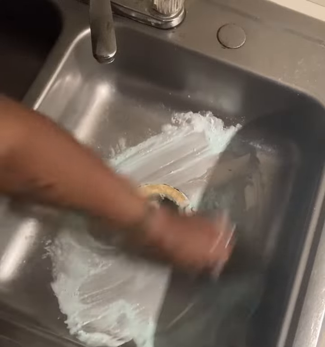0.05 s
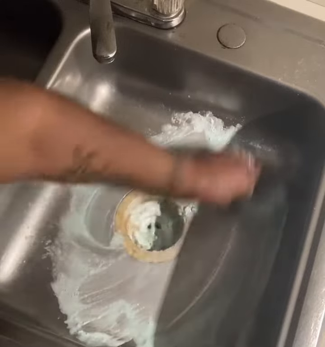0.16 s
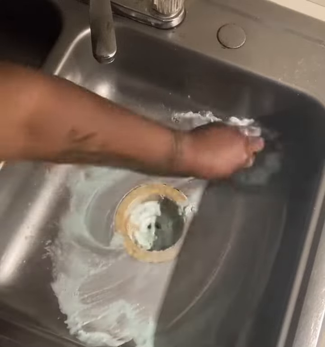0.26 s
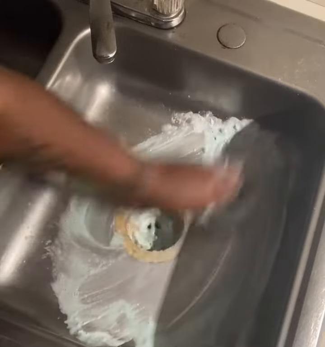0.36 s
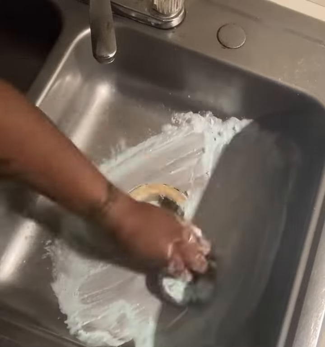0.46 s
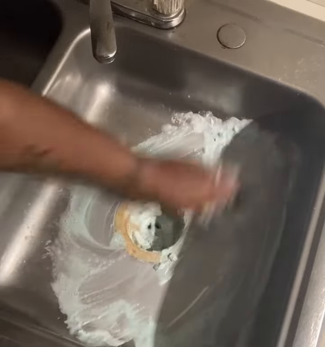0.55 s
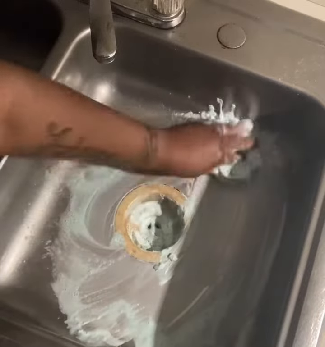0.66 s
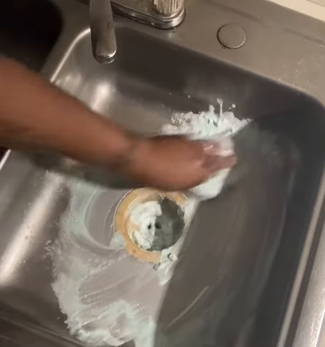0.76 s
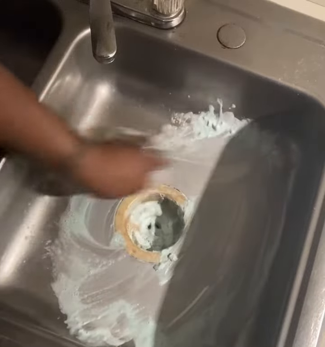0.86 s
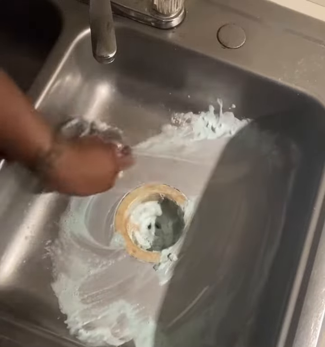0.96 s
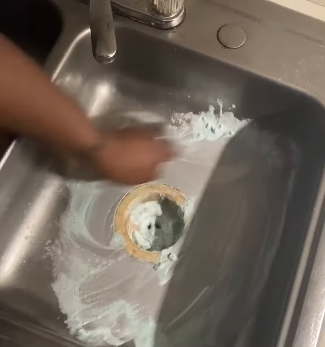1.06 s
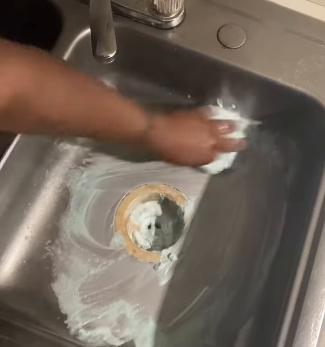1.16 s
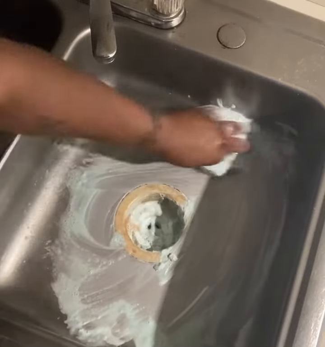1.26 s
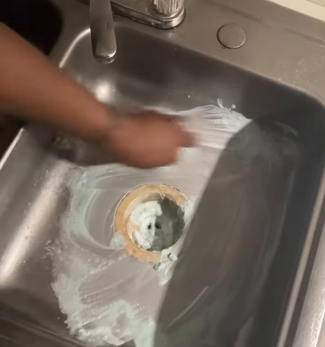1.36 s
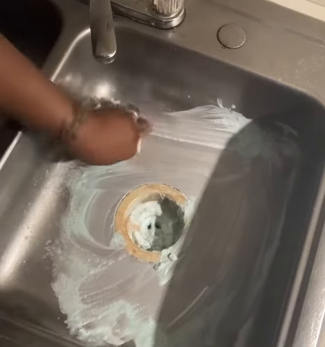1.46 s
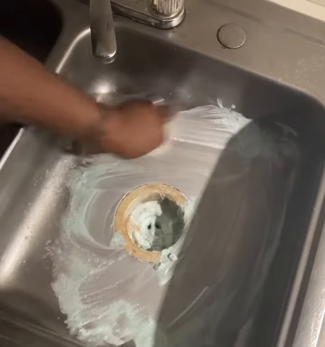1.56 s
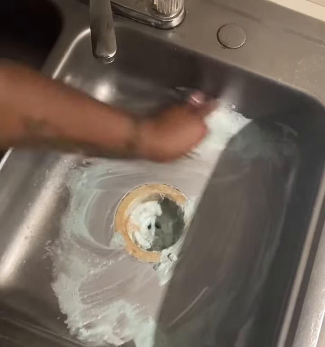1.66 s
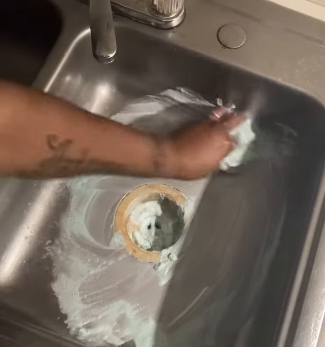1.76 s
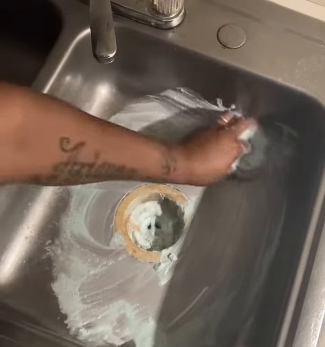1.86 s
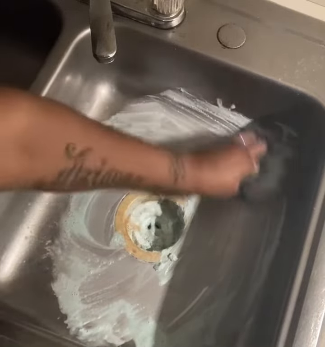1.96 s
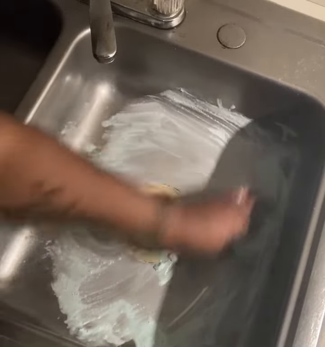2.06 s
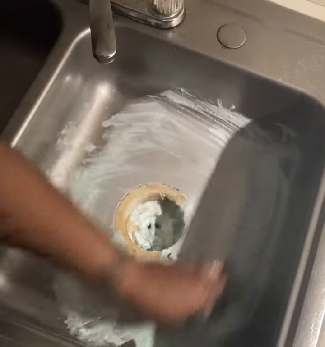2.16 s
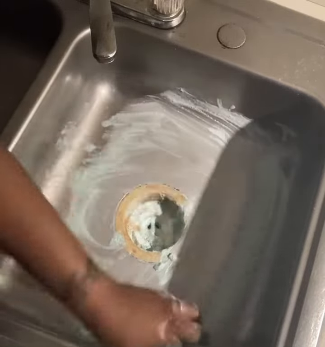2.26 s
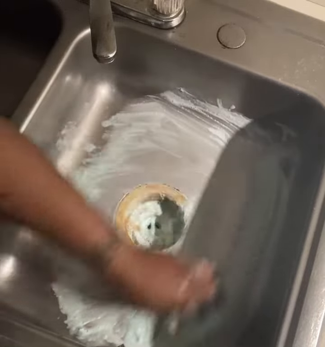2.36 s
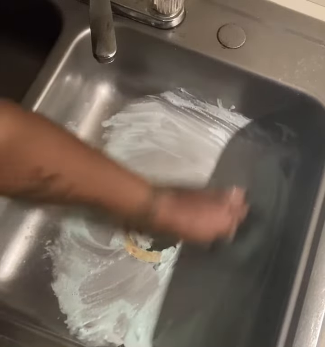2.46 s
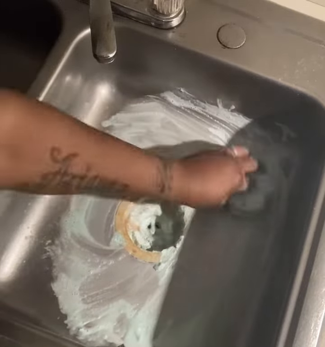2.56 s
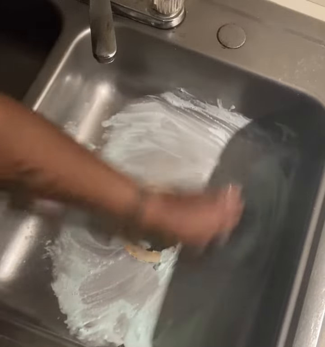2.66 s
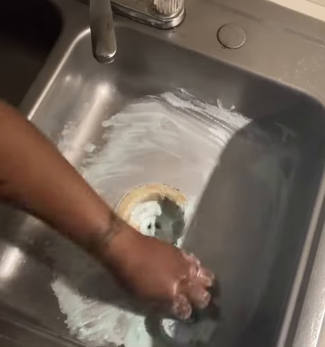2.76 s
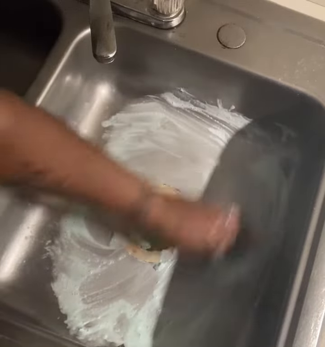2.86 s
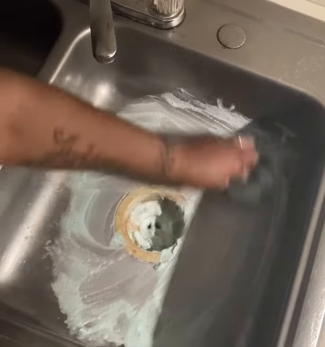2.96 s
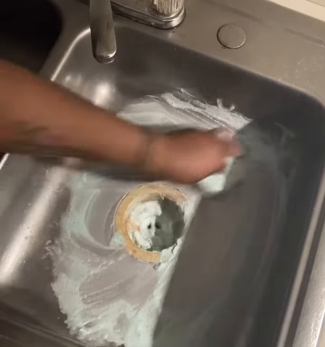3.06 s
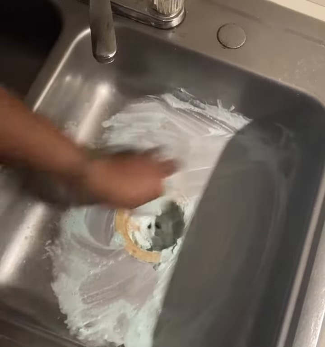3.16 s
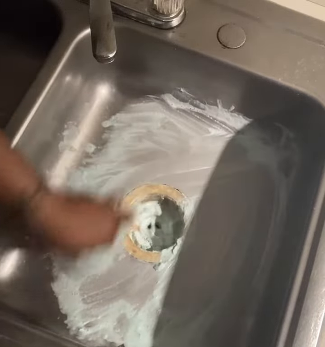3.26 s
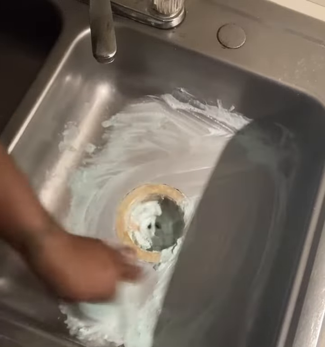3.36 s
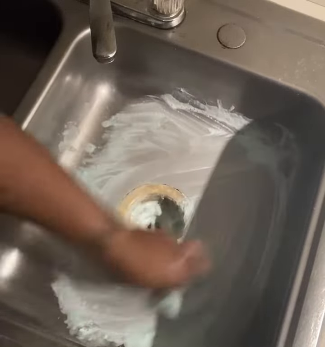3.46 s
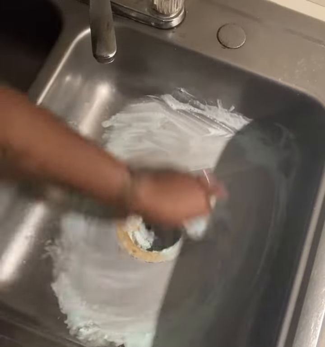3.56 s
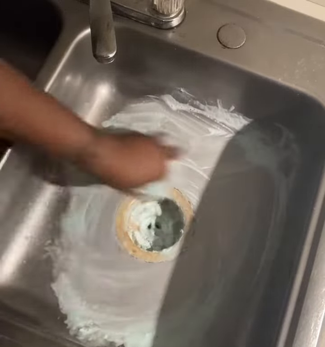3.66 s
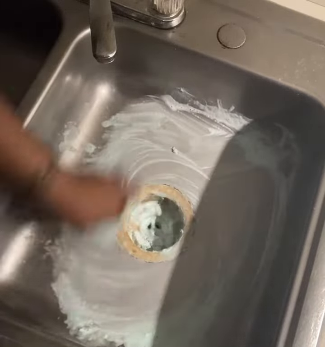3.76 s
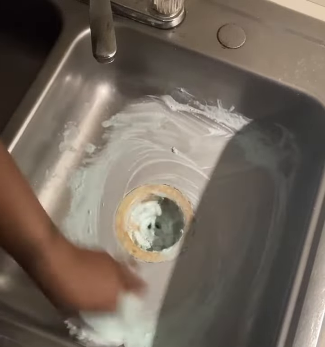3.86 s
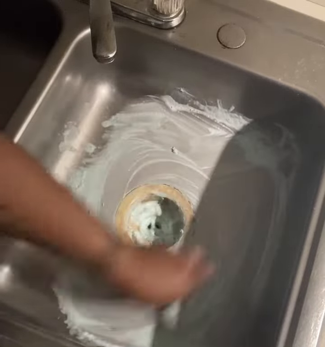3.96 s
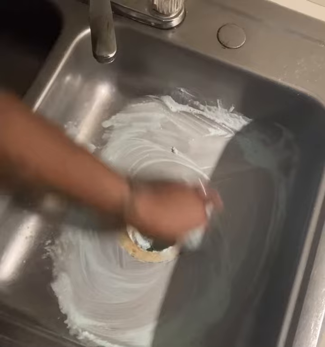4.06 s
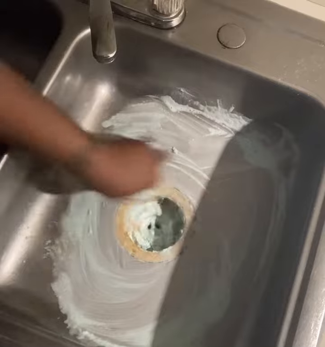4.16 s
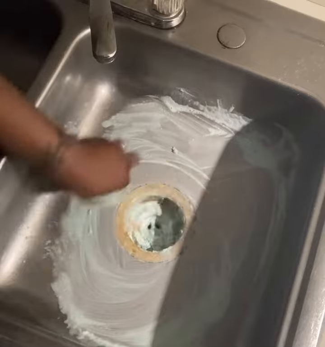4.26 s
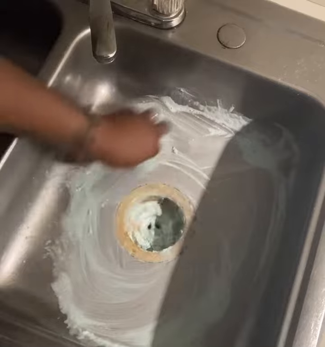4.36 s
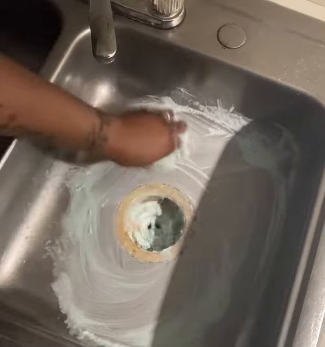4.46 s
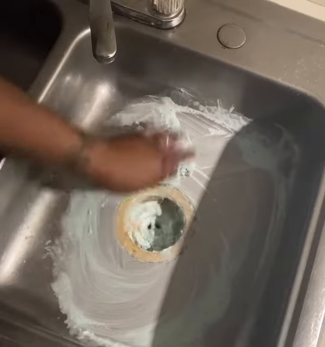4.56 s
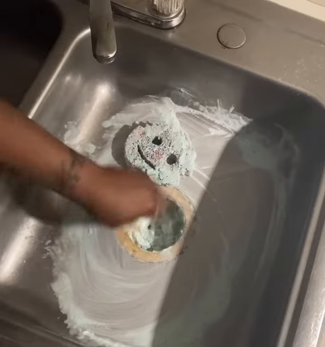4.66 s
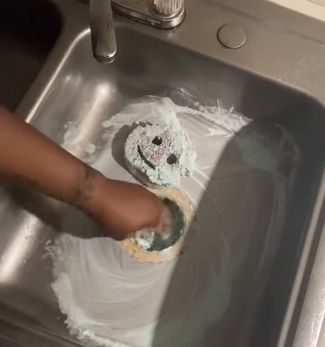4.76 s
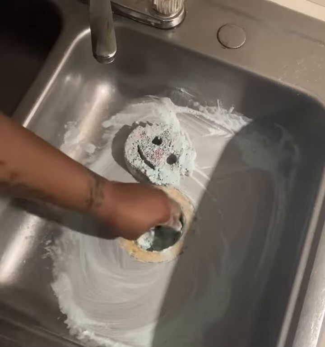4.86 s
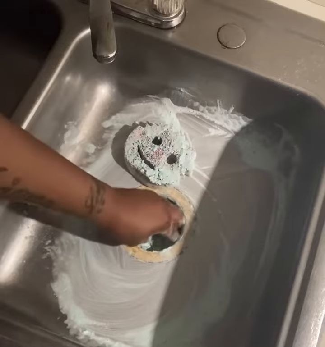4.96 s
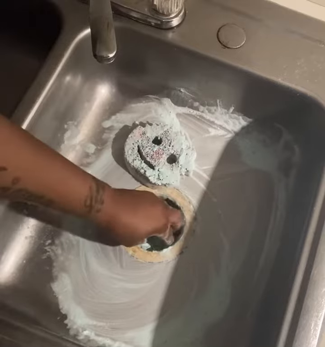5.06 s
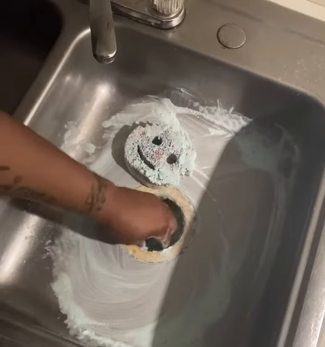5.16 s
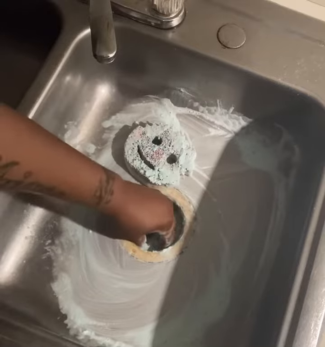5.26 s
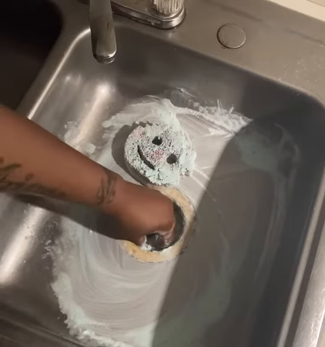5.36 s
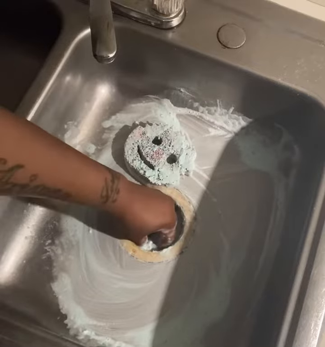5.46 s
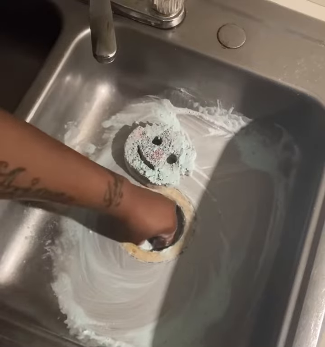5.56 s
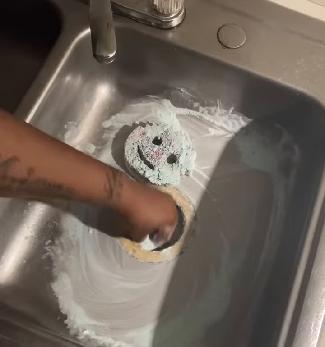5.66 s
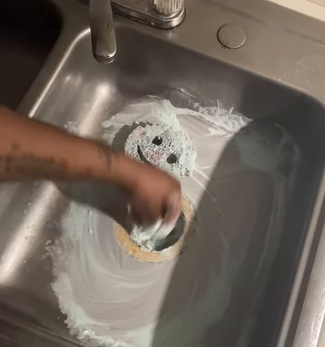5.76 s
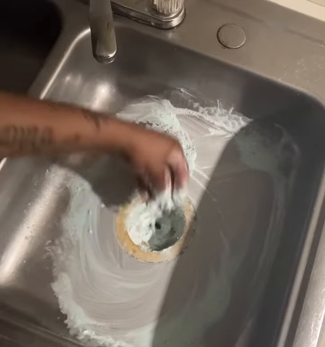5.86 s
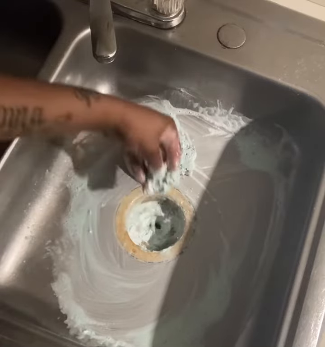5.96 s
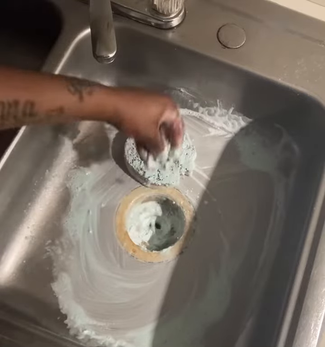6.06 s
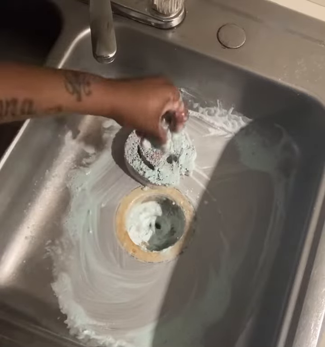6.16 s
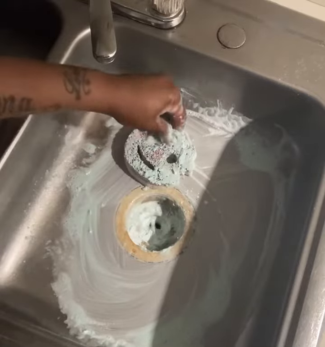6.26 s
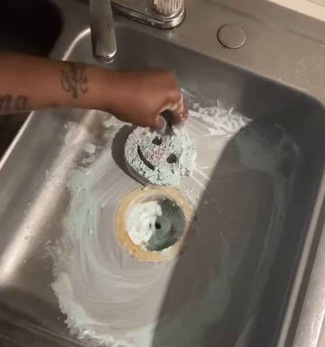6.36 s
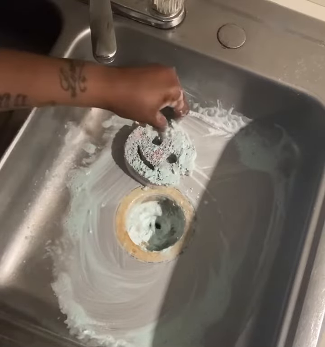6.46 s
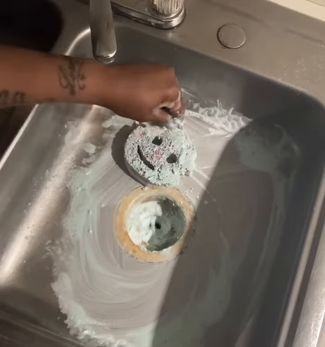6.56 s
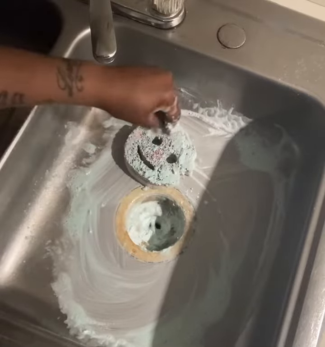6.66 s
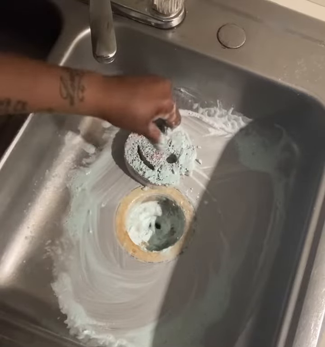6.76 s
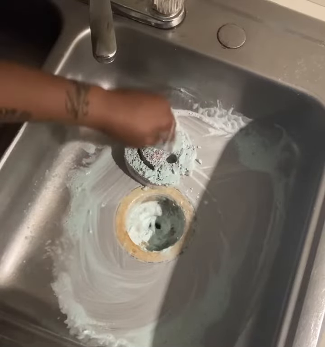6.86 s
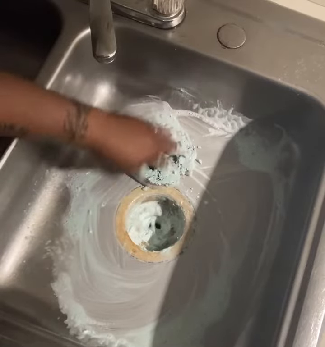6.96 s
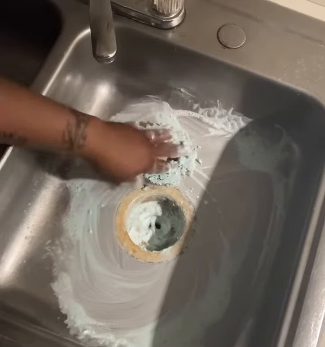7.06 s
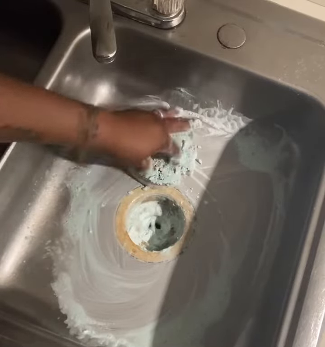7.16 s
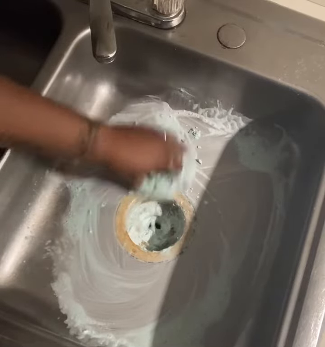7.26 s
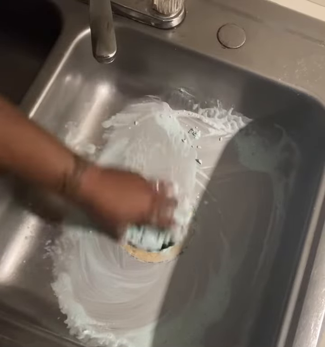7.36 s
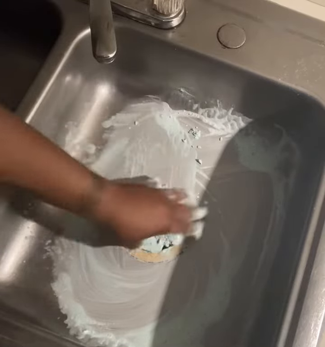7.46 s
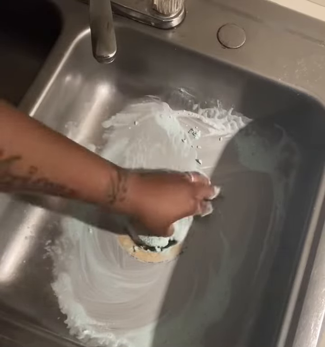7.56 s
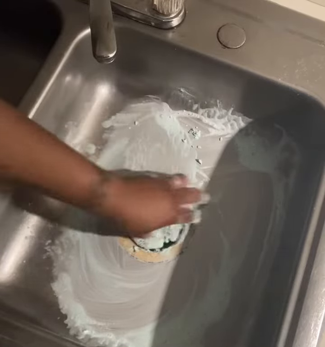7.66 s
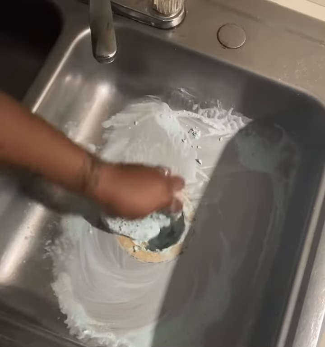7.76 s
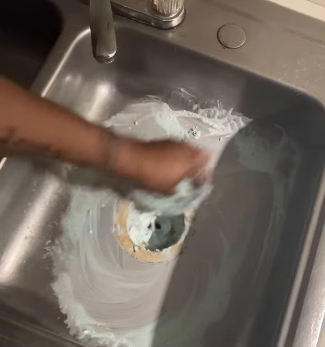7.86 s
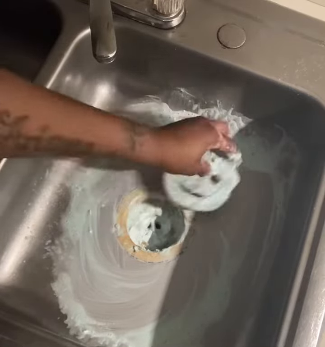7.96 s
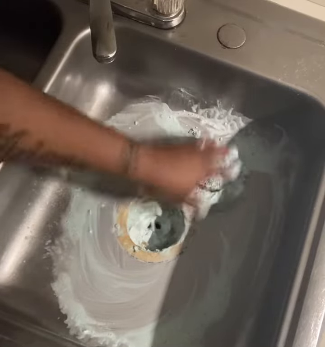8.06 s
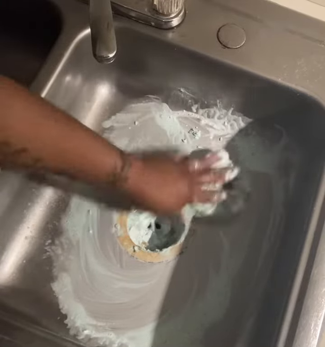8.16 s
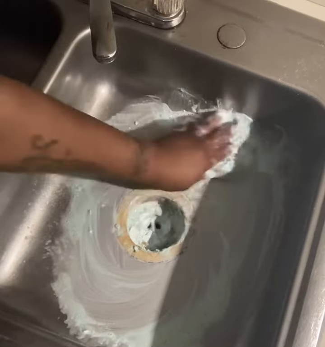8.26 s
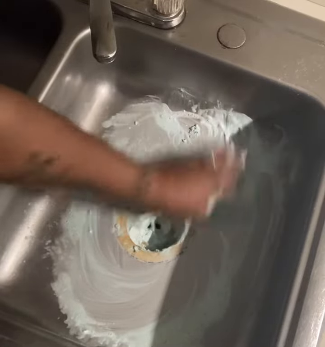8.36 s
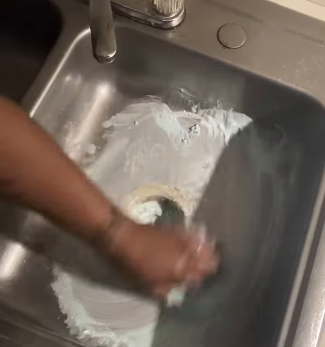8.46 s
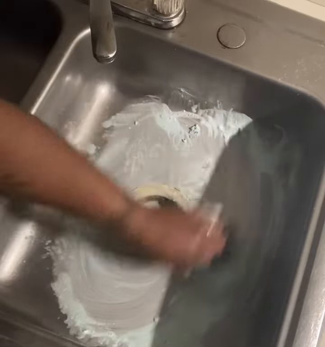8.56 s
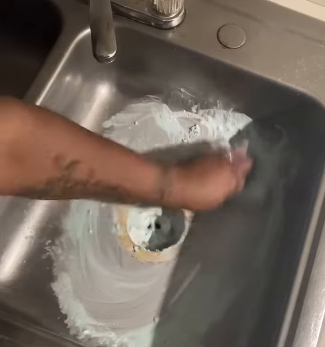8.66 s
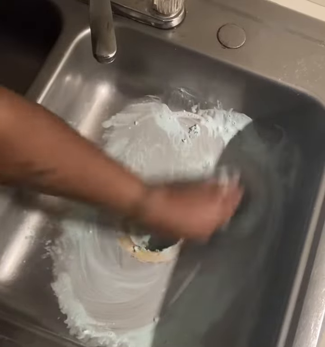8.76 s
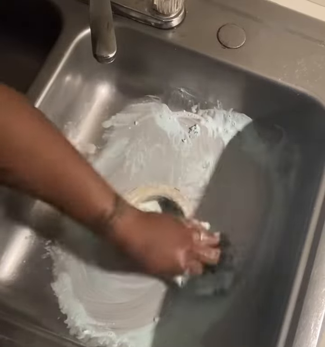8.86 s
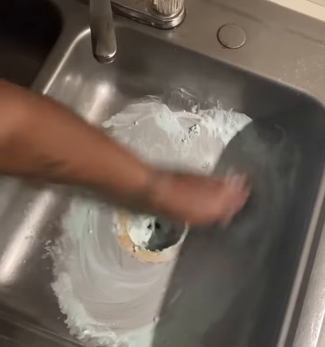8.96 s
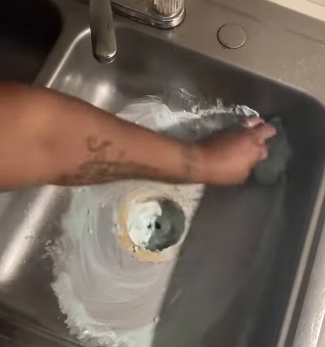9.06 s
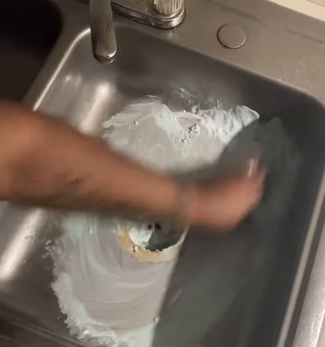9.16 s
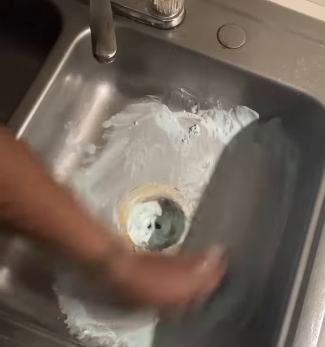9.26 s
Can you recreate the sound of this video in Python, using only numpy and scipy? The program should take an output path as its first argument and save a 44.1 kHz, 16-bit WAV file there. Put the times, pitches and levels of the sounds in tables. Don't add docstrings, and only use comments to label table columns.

```python
import sys
import numpy as np
from scipy import signal
from scipy.fft import rfft, irfft, next_fast_len
from scipy.io import wavfile
from scipy.ndimage import uniform_filter1d

SR = 44100
rng = np.random.default_rng(int(sys.argv[2]) if len(sys.argv) > 2 else 0)


def wav_out(sig):
    wavfile.write(sys.argv[1], SR, np.round(np.clip(np.atleast_2d(sig).T, -1, 1) * 32767).astype(np.int16))


def how_loud(loudness_db):
    steps = np.asarray(loudness_db, float) / 20
    return 10 ** steps


N = 411012
SPAN = next_fast_len(N, True)
FREQS = np.fft.rfftfreq(SPAN, 1 / SR) + 1


def along(table):
    hz, db = np.transpose(table)
    return np.interp(np.log(FREQS), np.log(np.maximum(hz, 1)), db)


def colour(x, table, band):
    below, above = (table[0][0] / 2, -60), (table[-1][0] * 2, -60)
    spectrum = rfft(x, SPAN) * how_loud(along([below] + list(table) + [above]))
    inside = spectrum[0][(FREQS > band[0]) & (FREQS < band[1])]
    rms = np.sqrt(2 * np.sum(np.abs(inside) ** 2)) / SPAN
    return irfft(spectrum, SPAN)[:, :N] / rms


def walk(rate):
    place = np.arange(N) * (rate / SR)
    k = place.astype(int)
    part = place - k
    levels = rng.standard_normal(k[-1] + 2)
    ease = part ** 2 * (3 - 2 * part)
    x = levels[k] + ease * (levels[k + 1] - levels[k])
    return x / x.std()


def grains(scatter_db, flicker_db, rate, patch_db):
    tails = np.minimum(rng.exponential(size=N), 4)
    size = how_loud(scatter_db * tails + flicker_db * walk(rate))
    cells = signal.stft(rng.standard_normal((2, N)) * size, nperseg=512)[2]
    patches = rng.standard_normal(cells.shape[1:])
    patches = uniform_filter1d(patches, size=3, axis=0)
    patches = uniform_filter1d(patches, size=9, axis=1)
    return signal.istft(cells * how_loud(patch_db * patches / patches.std()), nperseg=512)[1][:, :N]


def ring(x, modes):
    out = 0
    for hz, db, t60 in modes:
        w = 2 * np.pi * hz / SR
        r = np.exp(-np.log(1000) / (t60 * SR))
        out = out + signal.lfilter([0, how_loud(db) * r * np.sin(w)], [1, -2 * r * np.cos(w), r * r], x)
    return out


# turn t/s, grit level at the turn/dB,
# grit level at full speed/dB, fastest place/(0-1 of the stroke), drag on the sheet re grit/dB
FIRST_SCRUB = [(-.15, -55, -44.5, 0.51, -12.5), (.225, -62, -45, 0.72, -13.5), (.437, -58, -45, 0.5, -15.5),
               (.625, -59, -46.5, 0.69, -14), (0.936, -66, -49, 0.53, -13), (1.205, -71, -48.5, 0.5, -21),
               (1.445, -61.5, -48.5, 0.5, -11.5), (1.79, -61.5, -55.5, 1, -7), (1.93, -55, -46, 0.6, -14.5),
               (2.26, -56, -43.5, 0.52, -19.5), (2.552, -55, -42.5, 0.46, -18.5),
               (2.745, -51, -42, .6, -18), (2.98, -50.5, -42.5, 0.7, -18.5), (3.2, -47.5, -43.5, .5, -18),
               (3.33, -46.5, -41.5, 0.8, -19), (3.58, -44, -42, 0.1, -18), (3.74, -45, -42.5, 0.7, -19),
               (3.87, -43.5, -41, 0.6, -19), (4.09, -47, -42.5, 0.36, -17.5),
               (4.235, -59.5, -47.5, 0.38, -14.5), (4.42, -58.5, -51.5, 0.14, -7)]
FINGERS = [(4.6, -97, -67.5, 0.25, -3), (4.66, -103, -88, .3, -13), (4.72, -90, -73, 0.81, -6.5),
           (4.86, -87, -62.5, 0.6, -8), (5.0, -83, -64, 0.36, -12.5), (5.22, -100, -66, .5, -4),
           (5.4, -101, -69.5, 0.4, -1.5), (5.55, -75, -69.5, 0.27, 4.5), (5.8, -101, -71.5, 0.73, -13),
           (5.969, -81, -66.5, 1, -17), (6.17, -76, -68.5, 0.62, -18), (6.29, -80, -70.5, 0.46, -11),
           (6.4, -68, -68, 0.33, -27), (6.52, -69, -72, 0.37, -10.5), (6.62, -83, -67, 0.17, -25),
           (6.88, -90, -70.5, 0.55, -13.5), (7.03, -84, -66, 0.42, -11.5)]
SECOND_SCRUB = [(7.165, -83, -54, 0.78, -7.5), (7.2, -59, -47.5, 0.49, -10), (7.38, -63, -55, 0.67, -2.5),
                (7.472, -53, -46, 0.61, -10), (7.515, -59, -55, .4, -8.5), (7.57, -73, -50.5, 1, -8),
                (7.64, -48.5, -52, 0.45, -3), (7.775, -53, -54, .1, -4), (7.881, -78, -52.5, 0.82, -11.5),
                (7.965, -66, -53, 0.24, -11), (8.13, -57.5, -48, 0.61, -13),
                (8.265, -60.5, -42.5, 0.58, -17.5), (8.48, -51, -42.5, 0.64, -17.5),
                (8.67, -54.5, -42.5, 0.35, -15), (8.85, -47, -43.5, 0.52, -13.5),
                (9.05, -60.5, -50, 0.43, -5), (9.15, -51.5, -42.5, 0.43, -19), (9.29, -42, -49, .5, -11),
                (9.4, -50, -50, .5, -12)]


def strokes(bend):
    turn, turn_db, full_db, place, drag_db = np.transpose(FIRST_SCRUB + FINGERS + SECOND_SCRUB)
    t = np.arange(N) / SR
    fastest = turn[:-1] + np.clip(place[:-1], .05, .95) * np.diff(turn)
    k = np.clip(np.searchsorted(turn, t) - 1, 0, len(turn) - 2)
    edge = k + (t > fastest[k])
    slack = np.abs((t - fastest[k]) / (turn[edge] - fastest[k])) ** bend
    level_db = full_db[k] + slack * (turn_db[edge] - full_db[k])
    return level_db, np.interp(t, fastest, full_db[:-1]), np.interp(t, fastest, drag_db[:-1])


# t/s, judder level/dB, release/s, flexing re judder/dB
CATCHES = [(.185, -50, 0.016, -8.5), (.27, -53.5, 0.023, -21), (.58, -55.5, 0.046, -7),
           (.68, -52, 0.024, -8), (.96, -57.5, 0.027, -8), (1.13, -62, 0.034, 0),
           (1.259, -56.5, 0.068, -10), (1.411, -56.5, 0.023, -12), (1.56, -58.5, 0.12, -1.5),
           (1.9, -70, 0.018, -13), (2.199, -54, 0.042, -3), (2.299, -52, 0.018, -2.5),
           (2.96, -56.5, 0.027, -22), (3.14, -55.5, 0.083, -2.5), (4.07, -56.5, 0.021, -3),
           (4.21, -69, 0.045, 7), (4.33, -73.5, 0.35, 6.5), (5.33, -80, 0.045, 11), (5.46, -67.5, 0.06, 11),
           (5.63, -64, 0.023, -14), (6.655, -70, 0.033, 6), (7.29, -63, .03, -7), (7.49, -55.5, 0.045, 2),
           (7.68, -53, 0.078, -4), (8.006, -51.5, 0.076, 8), (8.21, -56, 0.081, -1),
           (8.49, -52.5, 0.033, -5), (8.889, -52, 0.017, -2), (9.01, -43, 0.021, -9),
           (9.301, -44, 0.013, -5.5)]


def catches():
    rise_s = 0.0093
    out = np.zeros((2, N + SR))
    late = np.arange(-SR // 20, SR // 2) / SR
    for s, db, release, flex_db in CATCHES:
        shape = np.where(late < 0, np.exp(-(late / rise_s) ** 2), np.exp(-2 * late / release))
        start = int((s + late[0]) * SR)
        out[:, start:start + len(late)] += shape * how_loud([[2 * db], [2 * (db + flex_db)]])
    return out[:, :N]


def drag():
    held_db, full_db, drag_db = strokes(bend=2.8)
    return full_db, drag_db, held_db - full_db


# f/Hz, level/dB (per Hz)
GRIT = [(1470, -20.5), (2500, -10.5), (3190, -11.5), (3810, -2.5), (4610, -3), (5060, 0), (7710, -1.5),
        (9700, -1), (14100, -2), (15600, -6)]


def grit_hiss(caught):
    coarse_offset_db, coarse_per_drag, coarse_dip, catch_db = -4, 0.34, 0.95, -2.5
    fine_db = strokes(bend=2.85)[0]
    full_db, drag_db, stall_db = drag()
    coarse_db = full_db + coarse_offset_db + coarse_per_drag * drag_db + coarse_dip * stall_db
    grit = colour(grains(2.3, 0.8, 30, 1.8), GRIT, band=(4000, 8000))
    fine = signal.sosfiltfilt(signal.butter(4, 8000, "high", fs=SR, output="sos"), grit)
    coarse = (grit - fine) * np.sqrt(how_loud(2 * coarse_db) + caught * how_loud(2 * catch_db))
    return how_loud(fine_db) * fine / fine[0].std() + coarse


# f/Hz, level/dB (per Hz)
JUDDER = [(410, -29), (700, -6), (884, -5.5), (978, -4.5), (1300, 2), (1850, 5), (2360, 2), (3190, -0.5),
          (3730, -0.5), (4500, 3), (5850, -34), (9900, -120)]
# f/Hz, level/dB (per Hz)
FLEX = [(160, -35), (280, 0), (367, 0.5), (460, -11), (501, -5), (591, -4.5), (794, 0.5), (884, -20),
        (950, -6.5), (1240, -29), (2090, -120)]
# f/Hz, level/dB, T60/s
RUBBED = [(1049, 1, 0.22), (1210, 1.5, 0.089), (1366, -3.5, 0.06), (1504, -1, 0.087), (1930, -4, 0.21),
          (2125, 1.5, 0.15), (2700, -11, 0.064)]


def foam_judder(caught, bent):
    judder_dip, flex_offset_db, flex_wander_db = 0.31, -5.5, 5.5
    full_db, drag_db, stall_db = drag()
    judder_db = full_db + drag_db + judder_dip * stall_db
    slips = grains(2.8, 1.0, 25, 3.0)
    judder = colour(slips, JUDDER, band=(900, 3500))
    rung = ring(judder, RUBBED)
    judder = 0.73 * judder + 0.21 * rung / rung[0].std()
    flex = colour(slips, FLEX, band=(300, 850))
    flex_db = judder_db + flex_offset_db + flex_wander_db * np.clip(walk(5), -2, .5)
    return np.sqrt(how_loud(2 * judder_db) + caught) * judder + np.sqrt(how_loud(2 * flex_db) + bent) * flex


def scrub():
    caught, bent = catches()
    return grit_hiss(caught) + foam_judder(caught, bent)


# f/Hz, level/dB, T60/s
SHEET = [(89.1, 29, 0.53), (185.5, -17.5, 0.35), (248, -15, 0.18), (366, -9, 0.12), (429, -25, 0.073),
         (512, -19, 0.25), (566, -27, 0.16), (647, -16.5, 0.19), (798, -17, 0.28), (1043, -11, 0.18),
         (1167, -1, 0.18), (1355, -5, 0.15), (1470, -9, 0.15), (1850, 12, 0.1), (2100, -21, 0.11)]
# f/Hz, level/dB, T60/s
THUD = [(58.73, 5, 0.83), (94.6, -6, 0.58), (116, 8, 0.22)]
# t/s, peak level/dB, best-ringing f/Hz at that spot,
# focus/dB (lost an octave away), crack level/dB
KNOCKS = [(0.176, -42, 1110, 7, -0.5), (0.267, -60, 1850, 14, 11), (1.412, -52, 1900, 20, -10),
          (1.552, -41, 586, 3, -22), (1.742, -50, 1250, 30, -20), (1.853, -52, 1750, 25, -14),
          (2.199, -53, 1800, 9, 5), (2.3, -52, 700, 9, 3), (3.149, -46.5, 500, 1, -12),
          (4.051, -54, 950, 21, -15), (5.447, -57, 1300, 10, -10), (6.651, -46, 514, 40, -14),
          (7.408, -28.5, 208, 6.5, -20), (7.464, -32.5, 298, 3.5, -13), (7.487, -35.5, 444, 12, -15),
          (7.978, -47, 450, 6, -3), (7.998, -41, 900, 10, 1), (8.004, -20.5, 380, 6, -3.5),
          (8.209, -44.5, 1740, 3, 6.5), (8.487, -53, 900, 11, -8), (9.003, -38, 290, 4, -18),
          (9.289, -46, 1300, 6, -8)]


def knocks():
    palm_db_per_s = 4
    cabinet_db, cabinet_hz, db_per_octave, per_focus, cabinet_rise_s = -7, 403, -4.5, -0.5, .008
    out, size = np.zeros((2, N + SR)), SR // 3
    t = np.arange(size) / SR
    hz, mode_db, t60 = np.repeat(np.transpose(SHEET), 3, axis=1)
    hz = hz * np.tile([1, .95, 1.06], len(SHEET))
    t60 = t60 * np.tile([1, .6, .45], len(SHEET))
    mode_db = mode_db + np.tile([0, -4, -4], len(SHEET))
    chance = rng.standard_normal((len(KNOCKS), 4, len(hz)))
    modes = np.sin(2 * np.pi * hz[:, None] * t) * how_loud(-60 * t / t60[:, None])
    thud = ring(np.sin(np.pi * np.clip(t / 0.0049, 0, 1)), THUD)
    thud = thud * np.array([[1], [.3]]) * (1 - np.exp(-t / cabinet_rise_s))
    crack_shape = (1 - np.exp(-t / 0.00035)) * (np.exp(-t / 0.0034) + 0.39 * np.exp(-t / 0.0078))
    early = t[:1024]
    for (s, db, spot_hz, focus_db, crack_db), mix in zip(KNOCKS, chance):
        thud_db = cabinet_db + db_per_octave * np.log2(spot_hz / cabinet_hz) + per_focus * focus_db
        push = np.sin(np.pi * np.clip(early * 4 * spot_hz, 0, 1))
        skid = .02 * rng.standard_normal(1024) * np.exp(-early / .008)
        push = push / push.sum() + skid
        gains = how_loud(0.36 * mode_db + 2.8 * mix[:2] - focus_db * np.log2(hz / spot_hz) ** 2)
        gains *= np.sign(mix[2:])
        sheet = signal.fftconvolve(gains @ modes, push[None], axes=1)[:, :size]
        sheet = sheet * how_loud(-palm_db_per_s * focus_db * t)
        crack = rng.standard_normal((2, size)) * crack_shape
        blow = sheet / np.abs(sheet[0]).max() + how_loud(thud_db) * thud / np.abs(thud).max()
        blow = blow + how_loud(crack_db) * crack
        out[:, int(s * SR):int(s * SR) + size] += how_loud(db) * blow
    return out[:, :N] * how_loud([[0], [-5.0]])


# t/s, peak level/dB, f/Hz, T60/s
TICKS = [(4.6139, -49, 6720, 0.016), (4.8914, -54, 4200, 0.015), (4.908, -53, 3300, .015),
         (5.076, -45.5, 5000, 0.017), (5.2664, -66, 9240, 0.012), (5.44, -49, 4300, 0.015),
         (5.448, -49.5, 2700, .02), (6.24, -58, 7500, .012), (6.315, -52.5, 4250, 0.012),
         (6.452, -44.5, 9900, 0.019), (6.5494, -66, 2900, 0.012), (6.6486, -59, 9000, .03),
         (6.741, -57, 11600, 0.012), (6.7828, -58, 8500, 0.0098), (6.9072, -55, 10500, 0.012),
         (6.9282, -51, 11300, 0.02), (6.9784, -57, 10700, 0.012), (7.0605, -46, 9000, 0.025),
         (7.084, -42, 10400, 0.014), (7.1054, -46, 12800, 0.012), (7.1777, -36.5, 8150, 0.025),
         (7.4833, -30, 8760, 0.012), (7.91, -40, 4130, 0.038), (7.979, -31, 8010, 0.014),
         (8.0038, -18.5, 10900, 0.014), (8.0049, -22, 4400, 0.012), (8.1464, -35, 11800, 0.013),
         (9.003, -28.5, 4500, 0.036)]


def ticks():
    out, t = np.zeros((2, N + SR)), np.arange(SR // 20) / SR
    for s, db, hz, t60 in TICKS:
        burst = rng.standard_normal((2, len(t))) * np.exp(-np.log(1000) * t / max(t60, .001))
        edges = [hz / 1.6, min(hz * 1.8, .45 * SR)]
        burst = signal.sosfilt(signal.butter(1, edges, "band", fs=SR, output="sos"), burst)
        out[:, int(s * SR):int(s * SR) + len(t)] += how_loud(db) * burst / np.abs(burst[0]).max()
    return out[:, :N] * how_loud([[0], [-6.0]])


# t/s, length/s, f/Hz, level/dB
CHAFES = [(4.882, 0.034, 560, -80), (4.893, .08, 1000, -81), (5.264, .09, 1380, -77),
          (5.307, .075, 515, -66.5), (5.445, 0.078, 488, -59.5), (5.503, 0.063, 570, -73),
          (5.518, 0.065, 1380, -72), (5.612, 0.03, 1850, -69), (5.61, 0.045, 1360, -72),
          (5.782, 0.055, 2390, -83), (6.652, 0.021, 523, -51.5), (6.655, .025, 640, -68),
          (6.687, 0.044, 537, -65), (6.725, 0.044, 560, -78), (6.738, .03, 2100, -84),
          (6.933, .12, 1990, -87), (7.058, 0.066, 2000, -82), (7.073, 0.034, 1350, -81),
          (7.908, 0.029, 1940, -59.5)]


def chafes():
    t60_s, edge_s = 0.085, .006
    out, t = np.zeros((2, N + SR)), np.arange(SR // 4) / SR
    for s, length, hz, db in CHAFES:
        gate = np.clip(np.minimum(t, length - t) / edge_s, 0, 1)
        sizes = how_loud(2.8 * np.minimum(rng.exponential(size=len(t)), 4))
        slips = rng.standard_normal((2, len(t))) * sizes * gate
        sung = ring(slips, [(hz, 0, t60_s), (hz * 1.05, -5, t60_s / 2)])
        rms = np.sqrt(np.sum(sung[0] ** 2) / (length * SR))
        out[:, int(s * SR):int(s * SR) + len(t)] += how_loud(db) * sung / rms
    return out[:, :N]


# t/s, f/Hz, level/dB
WHISTLE = [
    [(5.16, 2380, -81), (5.187, 2640, -75), (5.228, 2930, -78), (5.3, 2930, -81), (5.37, 2960, -77),
     (5.42, 2950, -92), (5.48, 3000, -79), (5.54, 2880, -76), (5.58, 3080, -79)],
    [(5.66, 2750, -83), (5.72, 3080, -81), (5.83, 3010, -82), (5.875, 2780, -81), (5.915, 2380, -83)],
]


def whistle():
    out, t = 0, np.arange(N) / SR
    for s, hz, db in map(np.transpose, WHISTLE):
        gate = np.clip(np.minimum(t - s[0], s[-1] - t) / 0.014, 0, 1)
        phase = 2 * np.pi * np.cumsum(np.interp(t, s, hz)) / SR
        blur = np.array([.95 + .55 * walk(150) + .65j * walk(150) for _ in range(2)])
        out = out + gate * how_loud(np.interp(t, s, db)) * (blur * np.exp(1j * phase)).real
    return out


# f/Hz, bandwidth/Hz, level/dB
HUM = [
    (57.86, 9, -48),
    (96.7, 7, -55.5),
    (116.6, 0.39, -52),
    (234.4, 0.4, -64),
]


def compressor():
    out, t = 0, np.arange(N) / SR
    for hz, width, db in HUM:
        a, b, c, d = (walk(width) for _ in range(4))
        steady = np.clip(1 - width / 2, 0, 1)
        wobble = np.array([steady * 2 + (1 - steady) * (a + 1j * b), c + 1j * d]) / np.sqrt(2)
        out = out + how_loud(db) * (wobble * np.exp(2j * np.pi * hz * t)).real
    return out


# f/Hz, level/dB (per Hz)
KITCHEN = [(15, -26.5), (25, -0.5), (53, 0.5), (114, -1), (141, -12), (166, -12.5), (242, -12),
           (476, -29.5), (800, -69), (1400, -47.5), (3160, -73), (6920, -46), (12200, -49), (14400, -53),
           (16000, -66)]


def still_air():
    return how_loud(-54.5) * colour(grains(2.5, 0.71, 9, 2.54), KITCHEN, band=(25, 16000))


# f/Hz, side re mid level/dB
WIDTH = [(60, -18), (110, -13.5), (200, -10.5), (380, -4), (700, -2.5), (1290, -1), (2380, -3),
         (4400, -5.5), (5600, -10), (8120, -30), (15000, -29)]
# f/Hz, left re right level/dB
LEAN = [(60, .8), (200, .3), (400, .8), (700, 1), (1290, -3), (2380, -.3), (4400, 0)]
# f/Hz, width/Hz, level/dB
PORT_NOTCH = (745, 70, -12)


def scene():
    notch_hz, width_hz, depth_db = PORT_NOTCH
    notch_db = depth_db * np.exp(-((FREQS - notch_hz) / width_hz) ** 2 / 2)
    mid, side = rfft(scrub() + compressor() + still_air(), SPAN)
    near, wide = rfft(knocks() + ticks() + chafes() + whistle(), SPAN)
    mid = mid * how_loud(notch_db) + near * how_loud(notch_db / 2)
    side = (side + wide) * how_loud(along(WIDTH))
    lean = how_loud(along(LEAN) / 2)
    return irfft(np.array([(mid + side) * lean, (mid - side) / lean]), SPAN)[:, :N]


def band_limit(x):
    return signal.sosfilt(signal.butter(12, 15820, fs=SR, output="sos"), x)


def record(dry):
    bass_cut = signal.butter(2, 41, "high", fs=SR, output="sos")
    treble_cut = signal.ellip(10, .2, 80, 15750, fs=SR, output="sos")
    mix = signal.sosfilt(np.vstack([bass_cut, treble_cut]), dry)
    return band_limit(mix)


dry = scene()
out = record(dry)
wav_out(out)
```